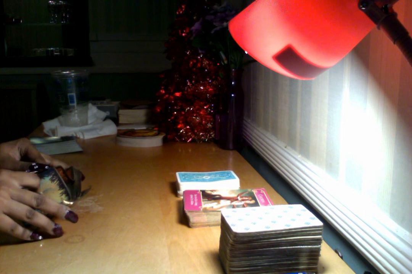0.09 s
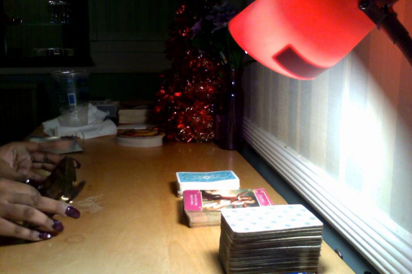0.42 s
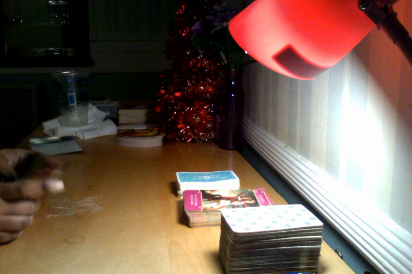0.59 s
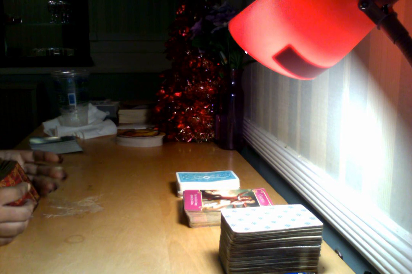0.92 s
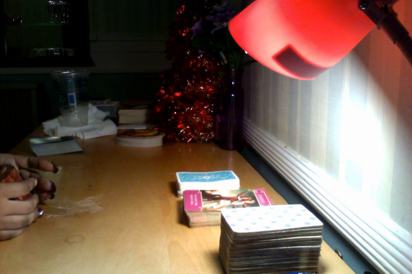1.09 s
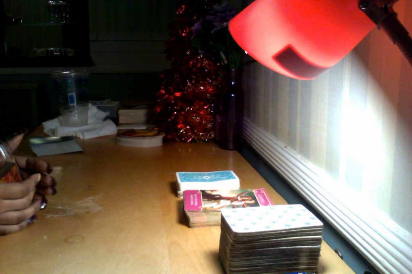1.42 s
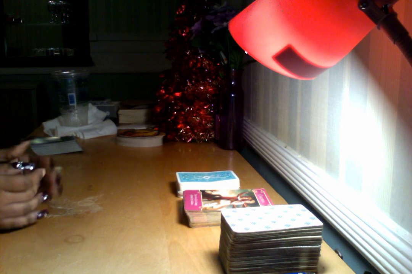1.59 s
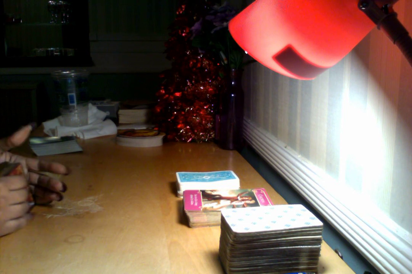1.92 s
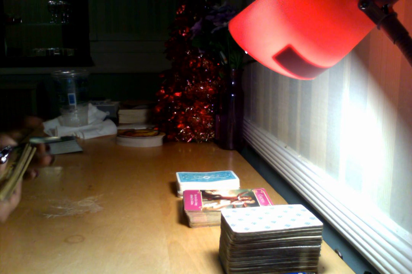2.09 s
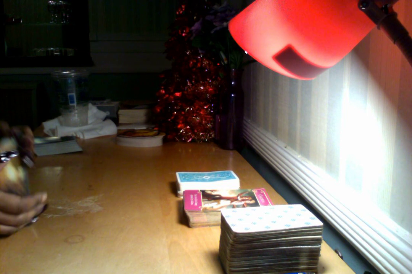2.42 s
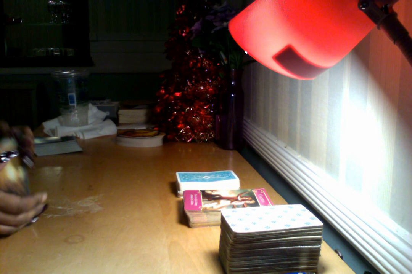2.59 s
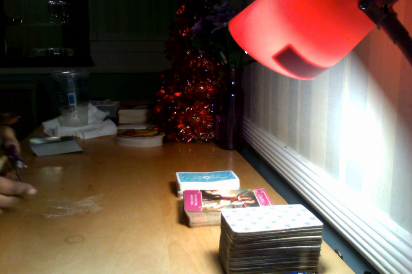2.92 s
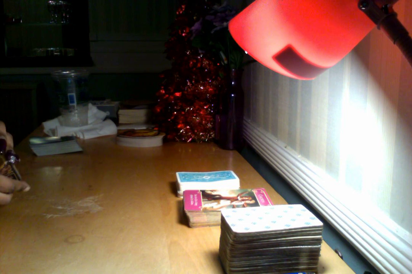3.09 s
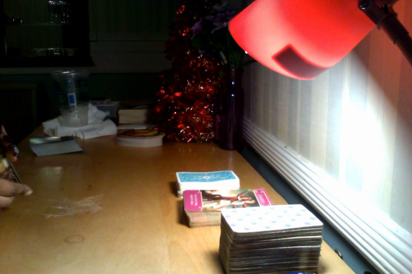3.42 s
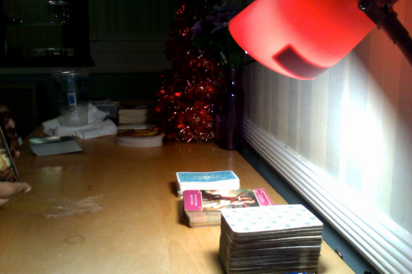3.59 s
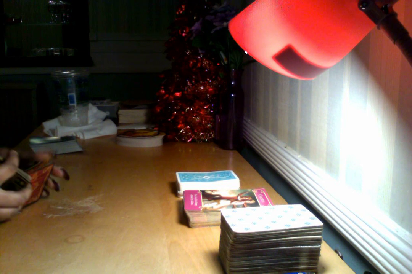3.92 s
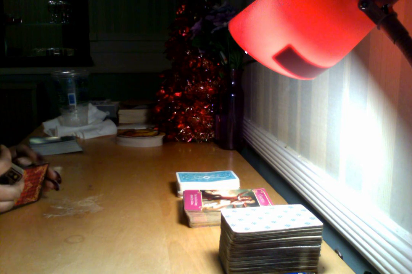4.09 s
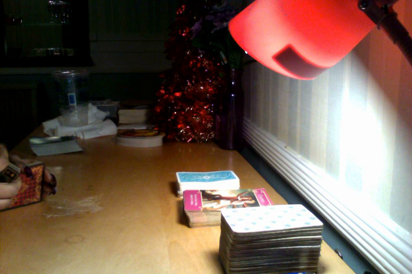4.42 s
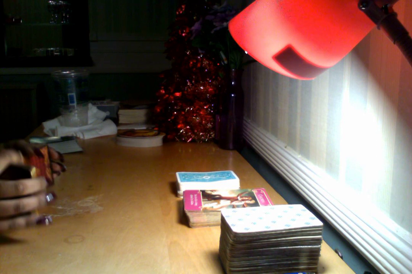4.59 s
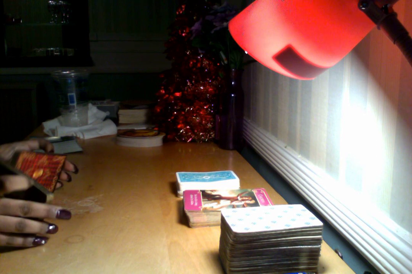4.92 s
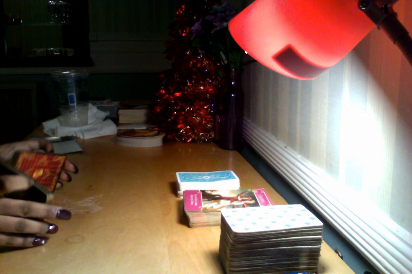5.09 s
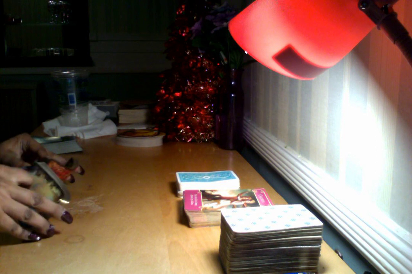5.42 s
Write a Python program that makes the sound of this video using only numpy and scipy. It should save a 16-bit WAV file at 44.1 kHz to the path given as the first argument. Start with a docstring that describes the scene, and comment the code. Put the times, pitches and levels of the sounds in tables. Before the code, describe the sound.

A short riffle of cards snaps close by, then the deck is knocked on a wooden table, slapped down hard, and knocked square again.

```python
"""Deck of cards on a wooden table

A deck is handled over a wooden table in a bare, ringing room: snaps and ticks close and fairly dry.
Cards snap off the thumb in a short riffle and slide together; noise bursts shape the contacts and rubs.
The deck is knocked square twice and slapped down once; decaying sines make the table ring and boom.
The slap fills the room and overloads the small microphone; still air, hum and a faint whine lie behind."""
import sys
import numpy as np
from scipy import signal
from scipy.fft import rfft, irfft
from scipy.io import wavfile

SR = 44100
rng = np.random.default_rng(int(sys.argv[2]) if len(sys.argv) > 2 else 0)


def transcribe(u):
    """Save the signal u as a 16-bit wav file named by the first command-line argument.

    u: samples, shape (n,) or (channels, n), limited to [-1, 1]; the rate is SR.
    q: integer samples, one column per channel.
    """
    v = np.clip(np.atleast_2d(u).T, -1, 1)
    q = np.round(v * 32767).astype(np.int16)
    wavfile.write(sys.argv[1], SR, q)


N = 243431  # samples


def gain_of(db):
    """Decibels to an amplitude factor."""
    return 10 ** (np.asarray(db) / 20)


def evened(x):
    """Scales to rms 1."""
    return x / np.sqrt(np.mean(x ** 2) + 1e-20)


def read(points, hz):
    """Reads a table on a log-frequency axis."""
    f, value = np.transpose(points)
    return np.interp(np.log(hz + 1), np.log(f + 1), value)


def add(mix, s, sound):
    """Mixes a sound in at a time in seconds."""
    part = mix[max(round(s * SR), 0):][:len(sound)]
    part += sound[:len(part)]


def coloured(x, colour):
    """Gives a full-length sound a spectrum, at rms 1."""
    gain = gain_of(read(colour, np.fft.rfftfreq(N, 1 / SR)))
    return evened(irfft(rfft(x) * gain, N))


def narrow_noise(hz, width, size):
    """Noise narrowed to a fuzzy spectral line, at rms 1."""
    bins = np.fft.rfftfreq(size, 1 / SR)
    line = 1 / (1 + (2 * (bins - hz) / width) ** 2)
    return evened(irfft(rfft(rng.standard_normal(size)) * line, size))


def click(colour, tilt_db, size=2048):
    """A causal, minimum-phase impulse of energy 1 with a tilted spectrum."""
    hz = abs(np.fft.fftfreq(size, 1 / SR))
    octaves = np.log2(1 + hz / 2000)  # the tilt acts mostly above 2 kHz
    log_gain = np.log(gain_of(read(colour, hz) + tilt_db * octaves) + 1e-5)
    spectrum = np.exp(np.conj(signal.hilbert(log_gain)))
    pulse = np.fft.ifft(spectrum).real[:size // 2]
    return pulse / np.linalg.norm(pulse)


def contacts(rows, colour, first, rise, size=3000):
    """Each blow is one sharp contact and a swelling, dying clatter of the neighbouring card edges."""
    out, t = np.zeros(N), np.arange(size) / SR
    clatters = rng.standard_normal((len(rows), size))
    for (s, db, tilt_db, decay), clatter in zip(rows, clatters):
        force = clatter * np.exp(-t / max(decay, 1e-4)) * (1 - np.exp(-t / rise))
        force[0] = first  # the sharp contact, against clatter of unit strength
        add(out, s, gain_of(db) * signal.fftconvolve(force, click(colour, tilt_db)))
    return out


def ringing(modes, rise, size=30000):
    """Decaying sines that take a moment to build up."""
    t = np.arange(size) / SR
    ring = sum(gain_of(db - 60 * t / t60) * np.sin(2 * np.pi * hz * t) for hz, db, t60 in modes)
    return ring * (1 - np.exp(-t / rise))


def wall_echo(x, low_hz, echo_db):
    """The wall beside the table throws the treble of a contact back 8 ms later."""
    bright = signal.sosfilt(signal.butter(1, low_hz, "high", fs=SR, output="sos"), x)
    out = x.copy()
    add(out, .008, gain_of(echo_db) * bright)
    return out


# cards snapping off the thumb:
# [t/s, relative level/dB, treble tilt/dB per octave, clatter decay constant/s]
SNAPS = [(.096, -24.5, -8, 0.0011), (.1035, -21, -3, 0.0009), (.115, -17, 8, 0.00097),
         (.202, -26.5, -12, 0.00036), (.2095, -12, 3.5, 0.0039), (.2285, -17, -3, 0.0012),
         (.279, -26.5, -0.5, .003), (.292, -20.5, 2, 0.0027), (.3085, -16, -2, 0.00041),
         (.3155, -12, -11.5, 0.0033), (.3203, -4, 1.5, 0.0031), (.361, -15.5, 8, 0.0025),
         (.395, -20, 6, 0.0046), (.4325, -16.5, -3, 0.0025)]
# spectrum of a snap: [f/Hz, relative level/dB]
SNAP_COLOUR = [(70, -46), (150, -16), (280, -27), (400, -7.5), (900, -13.5), (1300, 3), (1800, 2.5),
               (2400, -2), (3400, -7.5), (5500, -16), (8000, -19.5), (11000, -20.5), (16000, -42.5)]


def riffle():
    """Bent cards spring free and slap the pile."""
    snaps = contacts(SNAPS, SNAP_COLOUR, first=8.4, rise=0.000073)
    return gain_of(-3.5) * wall_echo(snaps, low_hz=4857, echo_db=-5.5)


# the whole deck slapped down hard: t/s, relative level/dB, clatter decay constant/s
SLAP_S, SLAP_DB, BLOW_S = 2.5628, 5.5, 0.0041
# protruding cards touch first, soft and dull: lead/s, level against the blow/dB, tilt/dB, decay/s
LEAD_S, LEAD_DB, LEAD_TILT_DB, LEAD_DECAY_S = 0.0032, -8.5, -17.5, 0.0077
# stragglers drop just after: delay/s, level against the blow/dB, tilt/dB, decay/s
LATE_S, LATE_DB, LATE_TILT_DB, LATE_DECAY_S = 0.0083, -2.5, -2, 0.0033
# spectrum of the slap, before each touch's tilt: [f/Hz, relative level/dB]
SLAP_COLOUR = [(60, -39), (115, -8.5), (160, -21.5), (212, -10), (270, -20), (390, -15.5), (497, -4),
               (610, -15.5), (790, -19), (976, -19.5), (1180, -8.5), (1400, -17.5), (1550, -10),
               (1750, -12), (1930, -13.5), (2150, -18.5), (2470, -23), (2820, -14.5), (3100, -15.5),
               (3500, -17.5), (4000, -17.5), (4630, -28), (5500, -19.5), (6900, -25.5), (9000, -40.5),
               (15500, -63.5)]


def slap():
    """The deck comes down hard: first touch, main blow and stragglers."""
    rows = [(SLAP_S - LEAD_S, SLAP_DB + LEAD_DB, LEAD_TILT_DB, LEAD_DECAY_S),
            (SLAP_S, SLAP_DB, 0, BLOW_S),
            (SLAP_S + LATE_S, SLAP_DB + LATE_DB, LATE_TILT_DB, LATE_DECAY_S)]
    return gain_of(-4.5) * contacts(rows, SLAP_COLOUR, first=1.0, rise=0.0017)


# what the slap sends out into the room: [f/Hz, relative level/dB]
SLAP_TAIL_COLOUR = [(60, -33), (120, -6), (165, -13), (210, -2.5), (280, -9.5), (390, -4.5), (500, -0.5),
                    (620, -6.5), (800, -11.5), (1000, -8.5), (1250, -5.5), (1400, -9.5), (1600, -4.5),
                    (1900, -6.5), (2400, -13), (2900, -10), (3800, -9.5), (4600, -18), (5600, -16),
                    (7000, -20), (9000, -31.5), (15500, -54.5)]
SLAP_TAIL_DB = 18.5  # against a pulse of energy 1


def slap_tail():
    """The flat deck radiates one broad pulse, which the room returns as an even, papery wash."""
    pulse = np.zeros(N)
    add(pulse, SLAP_S, gain_of(SLAP_TAIL_DB) * click(SLAP_TAIL_COLOUR, 0))
    return room(pulse)


# card edges landing on the table as the deck is squared; each touch has its own bass edge,
# and several first touches are thin:
# [t/s, relative level/dB, treble tilt/dB per octave, clatter decay constant/s, bass edge f/Hz]
KNOCKS = [(1.395, -36, -9, 0.011, 400), (1.403, -37.5, -8.5, 0.012, 248), (1.418, -34.5, -6, 0.022, 199),
          (1.427, -28.5, 0.5, 0.011, 150), (1.447, -15.5, -1.5, 0.0028, 101),
          (1.451, -23.5, -17, 0.005, 334), (1.456, -20.5, 5, 0.0033, 103), (1.47, -32, 4, 0.0057, 100),
          (1.592, -36, -6.5, 0.015, 202), (1.924, -43.5, -20.5, 0.0072, 121), (3.92, -42, -13, 0.011, 121),
          (4.602, -24, -8.5, 0.023, 740), (4.63, -21.5, 2, 0.0069, 154), (4.637, -19, 4, 0.0036, 119),
          (4.668, -28, -6, 0.0062, 291), (4.676, -16.5, 0, 0.0062, 100), (4.683, -21.5, -3.5, 0.0039, 120),
          (4.69, -21, 7, 0.0028, 118)]
# spectrum of a knock: [f/Hz, relative level/dB]
KNOCK_COLOUR = [(60, -35), (115, -6.5), (200, -17.5), (300, -15.5), (400, -18.5), (500, -4.5), (580, -16.5),
                (720, -10), (900, -16), (1050, -8.5), (1400, -12), (1650, -14.5), (1900, -10),
                (2400, -12.5), (2750, -16), (3000, -14.5), (3600, -17.5), (4600, -18), (5500, -24),
                (7000, -34.5), (8800, -50.5), (10700, -39), (12300, -80)]


def knocks():
    """The deck lands edge first, its cards a little out of line, so they touch down in small packets."""
    out = np.zeros(N)
    for *blow, edge_hz in KNOCKS:
        low_cut = signal.butter(2, edge_hz, "high", fs=SR, output="sos")
        touch = contacts([blow], KNOCK_COLOUR, first=0.46, rise=0.001)
        out += signal.sosfilt(low_cut, touch)
    return gain_of(2.5) * out


# what table and deck ring with under a blow: [f/Hz, relative level/dB, t60/s]
BODY = [(212, -4, .5), (389, -6, .3), (500, 7, .3), (606, -7, .4), (725, -11, .25), (1049, -5, .2),
        (1186, 3.5, .14), (1556, -4, .35), (1800, -6, .2), (1903, -6, .3), (1944, -5, .3), (2762, -11, .2),
        (3486, -10, .22), (3824, -12, .22)]
RING_DB = -28  # ring strength against the blow's tabled level


def table_ring():
    """Every knock, and the slap, stirs the table's modes in step with its strength."""
    out, ring = np.zeros(N), ringing(BODY, rise=0.002)
    for s, db, *_ in list(KNOCKS) + [(SLAP_S, SLAP_DB)]:
        add(out, s, gain_of(db + RING_DB) * ring)
    return out


# hands and deck pressing on the table top: [onset t/s, peak level before the microphone/dB]
THUMPS = [(.001, -35.5), (0.231, -35), (0.334, -35), (0.383, -36.5), (.456, -37), (1.453, -30.5),
          (1.599, -33.5), (1.727, -32.5), (2.459, -36), (2.571, -10.5), (2.667, -25.5), (3.928, -37.5),
          (4.039, -46), (4.151, -47.5), (4.624, -22.5), (4.682, -21.5)]
# the table top's slow bending modes: [f/Hz, relative level/dB, t60/s]
BOOM = [(122, 3, 0.11), (112, -27, 0.2), (133, -27, .3), (214, -14, .09), (212, -31, 0.45)]


def thumps():
    """The table top flexes under each push of a hand and each landing of the deck."""
    out, boom = np.zeros(N), ringing(BOOM, rise=0.13)
    boom /= abs(boom).max()
    for s, db in THUMPS:
        add(out, s, gain_of(db) * boom)
    return out


# light ticks of card edges and fingernails: [t/s, relative level/dB, treble tilt/dB per octave]
TICKS = [(0.689, -46, -13), (1.313, -58.5, 10), (1.592, -31, -1.5), (1.772, -49, -6), (1.891, -44.5, 1),
         (1.939, -31.5, 6), (1.972, -42, 6.5), (2.0345, -54, -7), (2.0367, -39.5, 11.5), (2.357, -58, 9),
         (2.492, -47, -16.5), (3.789, -42.5, 1), (3.809, -37, 11), (4.027, -44.5, -4), (4.128, -51, -13),
         (4.335, -59, -3), (5.035, -54, 12)]
# spectrum of a tick: [f/Hz, relative level/dB]
TICK_COLOUR = [(290, -43.5), (500, -18.5), (1000, 5), (1700, 2), (2760, 3), (3410, -22), (3720, -7.5),
               (4800, -13), (5860, -14.5), (11600, -31.5), (15000, -56)]
TICK_DECAY_S = .0025


def ticks():
    """Card corners catch and let go."""
    rows = [(s, db, tilt_db, TICK_DECAY_S) for s, db, tilt_db in TICKS]
    catches = contacts(rows, TICK_COLOUR, first=1.6, rise=.0008)
    return gain_of(7.5) * wall_echo(catches, low_hz=2150, echo_db=-7.5)


# bright little clinks: [t/s, relative level/dB]
CLINKS = [(2.0376, -39), (3.809, -58)]
# clusters of close modes that a clink rings with: [f/Hz, width/Hz, relative level/dB, t60/s]
CLINK_MODES = [(1400, 300, -2, .05), (2000, 300, -6, .1), (4900, 350, 3, .09), (7300, 400, -10, .07),
               (8600, 400, -5, .07), (10100, 300, -6, .08), (11500, 600, -2, .07)]


def clinks(size=20000):
    """A small, hard thing, perhaps a ring on a finger, clinks briefly as decaying narrow noise."""
    out, t = np.zeros(N), np.arange(size) / SR
    for s, db in CLINKS:
        ring = np.zeros(size)
        for hz, width, mode_db, t60 in CLINK_MODES:
            ring += gain_of(mode_db - 60 * t / t60) * narrow_noise(hz, width, size)
        add(out, s, gain_of(db - 4.0) * ring)
    return out


# strokes of cards rubbing on each other:
# [start t/s, length before release/s, relative body level/dB, relative fizz level/dB]
RUBS = [(0.0, 0.0023, -36, -25), (0.103, 0.013, -39, -31), (0.204, 0.022, -44, -31),
        (0.275, 0.1, -38, -24.5), (0.52, 0.06, -62, -58), (0.59, 0.07, -61, -56.5), (0.72, 0.05, -66, -68),
        (0.79, 0.09, -62, -66), (0.89, 0.13, -69, -63), (1.177, 0.03, -72.5, -66.5), (1.57, 0.06, -48, -69),
        (1.66, 0.12, -54, -68), (1.86, 0.1, -59, -61.5), (3.64, 0.11, -71, -64), (3.80, 0.11, -59, -57),
        (3.90, 0.12, -57, -60)]
# a stroke swells over a share of its length, eases off while it lasts, then dies away faster
RUB_ATTACK_SHARE, RUB_SAG_DB_PER_S = 0.55, 15


def strokes(column, release_db_per_s):
    """Gain curve of all rubbing strokes: swell, sagging hold, release."""
    out, t = np.zeros(N), np.arange(SR) / SR
    for row in RUBS:
        start, length = row[:2]
        swell = np.minimum(t / (RUB_ATTACK_SHARE * length), 1)
        fall_db = RUB_SAG_DB_PER_S * t + release_db_per_s * np.maximum(t - length, 0)
        add(out, start, swell * gain_of(row[column] - fall_db))
    return out


# spectrum of the rub's body: [f/Hz, relative level/dB]
RUB_COLOUR = [(100, -14.5), (200, -10), (290, -6), (500, 0.5), (640, -2.5), (850, 0), (1300, -2),
              (3000, -7.5), (6000, -38), (9000, -45.5)]
# spectrum of its fizz: [f/Hz, relative level/dB]
FIZZ_COLOUR = [(2060, -35), (3500, -5), (3810, -10.5), (4130, -4), (10500, -13), (15000, -30.5)]
CATCHES_PER_S = 11000
# a sliding card grips and frees unevenly: approximate depth/dB, length of one grip/s
GRIP_DB, GRIP_S = 3, .008


def rubs():
    """Card faces slide in countless tiny catches of uneven size, which come in clumps."""
    catches = (rng.random(N) < CATCHES_PER_S / SR) * rng.standard_normal(N)
    catches *= gain_of(3.5 * np.minimum(rng.exponential(1, N), 3))
    grips = np.arange(0, N / SR, GRIP_S)
    grip = np.interp(np.arange(N) / SR, grips, rng.uniform(-1.1, 1, len(grips)))
    catches *= gain_of(GRIP_DB * grip)
    body = strokes(column=2, release_db_per_s=210) * coloured(catches, RUB_COLOUR)
    fizz = strokes(column=3, release_db_per_s=260) * coloured(catches, FIZZ_COLOUR)
    return gain_of(5.5) * body + gain_of(-7.0) * fizz


# cards scraping as they are pushed home, one curve per scrape; the pitch follows their speed:
# [t/s, resonance f/Hz, level/dB]
SCRAPES = [
    [(.735, 467.3, -57.5), (.78, 501, -64), (.83, 521.4, -57), (.862, 639, -61), (.90, 518, -69),
     (.98, 445, -78)],
    [(4.862, 2393, -63), (4.905, 2127, -61), (4.955, 1550, -55), (4.972, 608, -51.5), (5.018, 495, -71)],
]
# width of the scrape's resonance, one per scrape: [width/Hz]
SCRAPE_WIDTHS_HZ = [230, 700]


def scrape():
    """Friction noise through a resonance that slides with the card's speed."""
    out, t = np.zeros(N), np.arange(N) / SR
    for curve, width_hz in zip(SCRAPES, SCRAPE_WIDTHS_HZ):
        s, hz, db = np.transpose(curve)
        low_pass = signal.butter(2, width_hz / 2, fs=SR, output="sos")
        band = signal.sosfilt(low_pass, rng.standard_normal(N))
        phase = 2 * np.pi * np.cumsum(np.interp(t, s, hz)) / SR
        slide = evened(band * np.cos(phase))  # noise band moved up to the resonance
        out += slide * np.interp(t, s, gain_of(db), left=0, right=0)
    return out


# the room's decay: [f/Hz, t60/s]
ROOM = [(100, .46), (500, .43), (1100, .42), (1350, .42), (1750, .47), (2400, .41), (3400, .47),
        (4200, .44), (5000, .39), (7000, .34), (10000, .18), (15000, .18)]


def room(x, build=0.009):
    """A dense tail of reflections, each band dying at its own speed."""
    hz, t, z = signal.stft(rng.standard_normal(SR), SR, nperseg=256)
    decay = gain_of(-60 * t / read(ROOM, hz)[:, None])
    tail = signal.istft(z * decay, SR, nperseg=256)[1]
    tail *= 1 - np.exp(-np.arange(len(tail)) / SR / build)
    return signal.fftconvolve(x, tail / np.linalg.norm(tail))[:N]


# spectrum of the still room air: [f/Hz, relative level/dB]
AIR = [(30, -32), (60, -14), (120, 1), (300, -4.5), (480, -5), (700, -11), (1300, -14.5), (3600, -21.5),
       (4600, -20.5), (6000, -27), (10000, -32), (15000, -48)]
AIR_DB = -67  # rms
# mains hum: [f/Hz, rms level/dB]
HUM = [(120, -78.5), (240, -74), (360, -73.5), (480, -78.5)]
# a thin, steady whine: [f/Hz, width/Hz, rms level/dB]
WHINE = [(4177, 25, -83), (4700, 60, -88)]


def background():
    """Still room air as shaped noise, with hum sines and a faint whine of narrow noise."""
    t, hum = np.arange(N) / SR, np.zeros(N)
    for hz, db in HUM:
        hum += gain_of(db) * np.sqrt(2) * np.sin(2 * np.pi * (hz * t + rng.random()))
    whine = sum(gain_of(db) * narrow_noise(hz, width, N) for hz, width, db in WHINE)
    return hum + whine + gain_of(AIR_DB) * coloured(rng.standard_normal(N), AIR)


# how much of each sound reaches the room's tail/dB
SNAP_ROOM_DB, TICK_ROOM_DB, KNOCK_ROOM_DB, THUMP_ROOM_DB, RUB_ROOM_DB = -12, -13, 0, -22, -8


def scene():
    """Snaps and ticks are close and fairly dry; the knocks and the slap fill the room."""
    snap, bang, knock, thump = riffle(), slap(), knocks(), thumps()
    tick = ticks() + clinks()
    rub = rubs() + scrape()
    send = (gain_of(SNAP_ROOM_DB) * snap + gain_of(TICK_ROOM_DB) * tick + gain_of(KNOCK_ROOM_DB) * knock
            + gain_of(THUMP_ROOM_DB) * thump + gain_of(RUB_ROOM_DB) * rub)
    direct = snap + tick + gain_of(3.0) * (knock + bang) + table_ring() + thump + rub
    return (direct + room(send) + slap_tail() + background())[None]


CEILING = .7  # microphone overload, of full scale
EDGE_HZ = 15900  # upper band limit


def record(dry, low_hz=75):
    """The small microphone loses deep bass and clips the slap; then the band limit."""
    thin = signal.sosfilt(signal.butter(3, low_hz, "high", fs=SR, output="sos"), dry)
    clipped = np.clip(thin, -CEILING, CEILING)
    low_pass = signal.firwin(511, EDGE_HZ, window=("kaiser", 9), fs=SR)
    return signal.oaconvolve(clipped, low_pass[None], "same")


dry = scene()
out = record(dry)
transcribe(out)
```